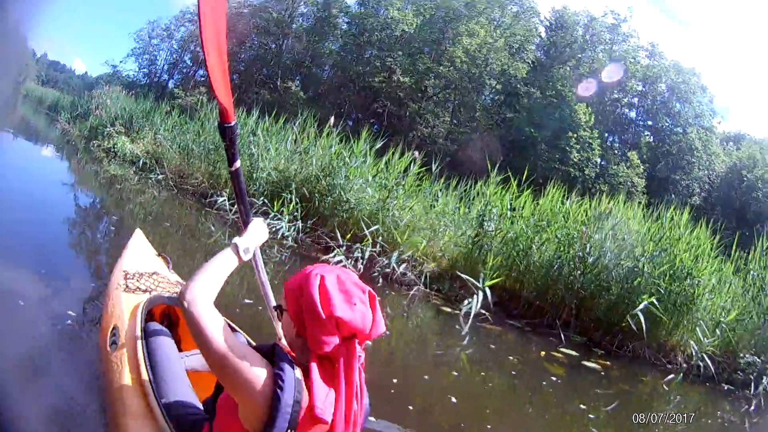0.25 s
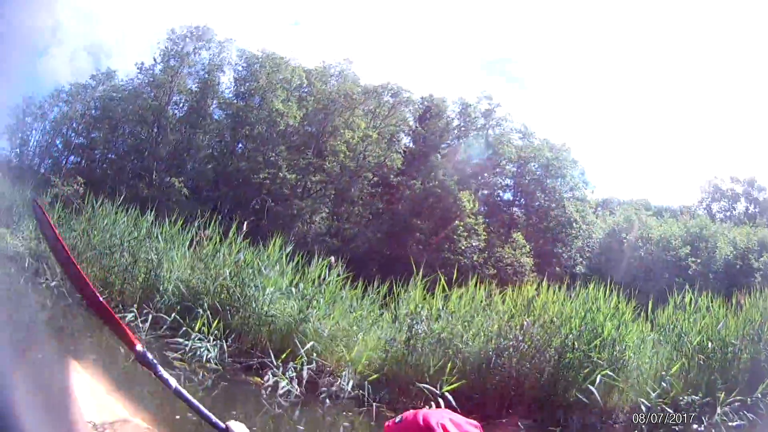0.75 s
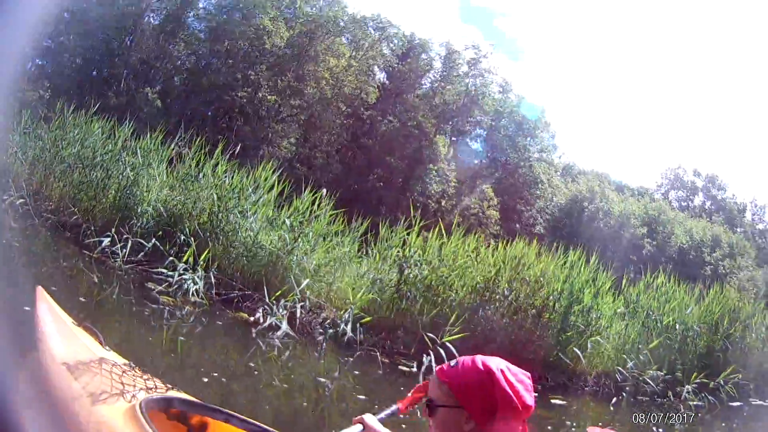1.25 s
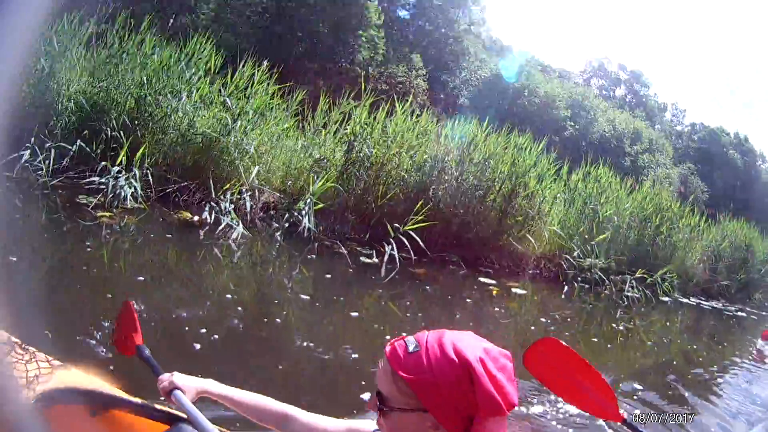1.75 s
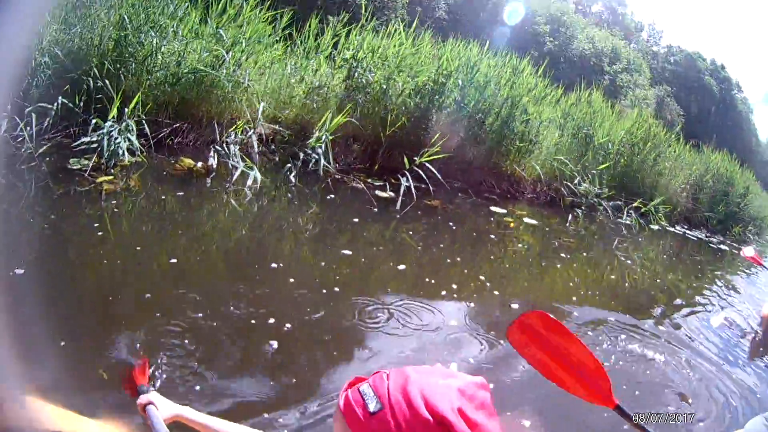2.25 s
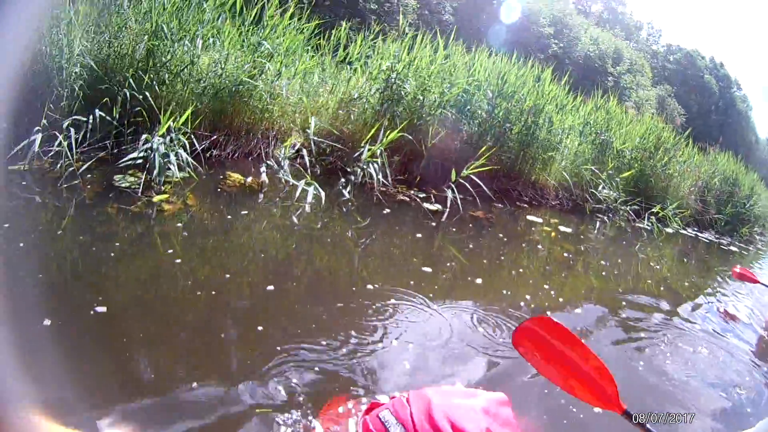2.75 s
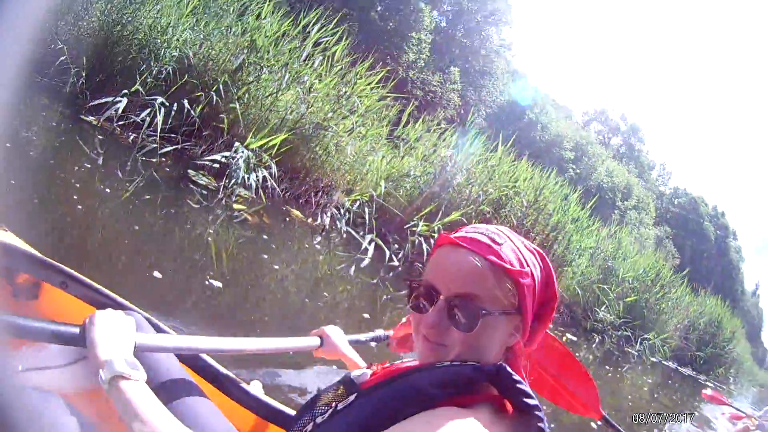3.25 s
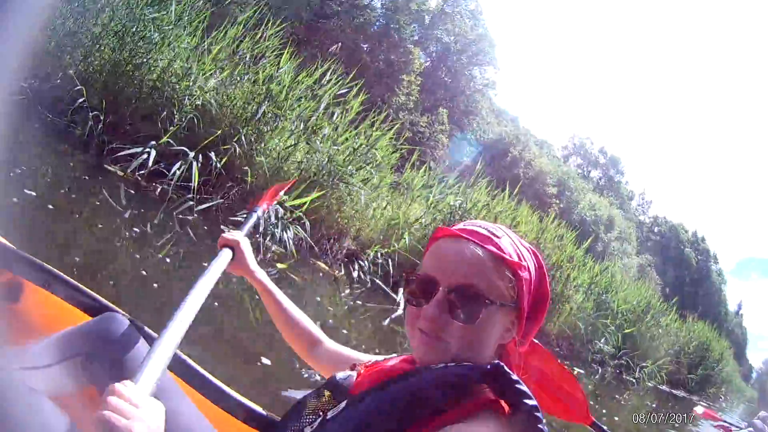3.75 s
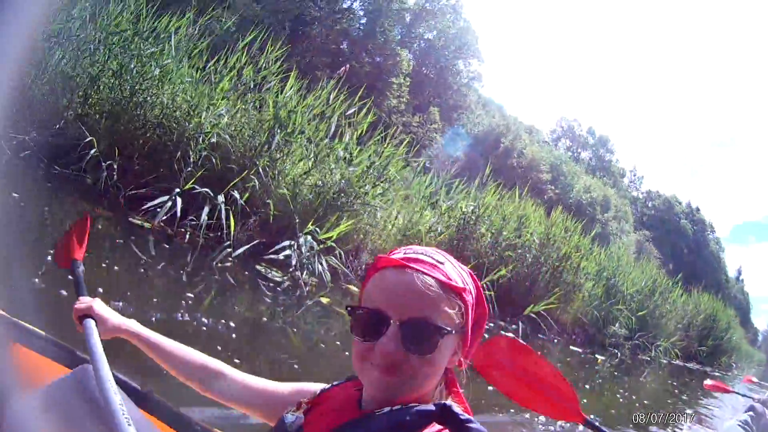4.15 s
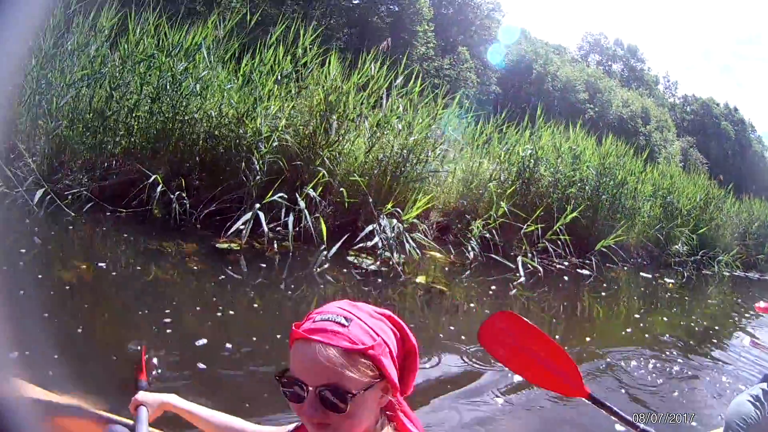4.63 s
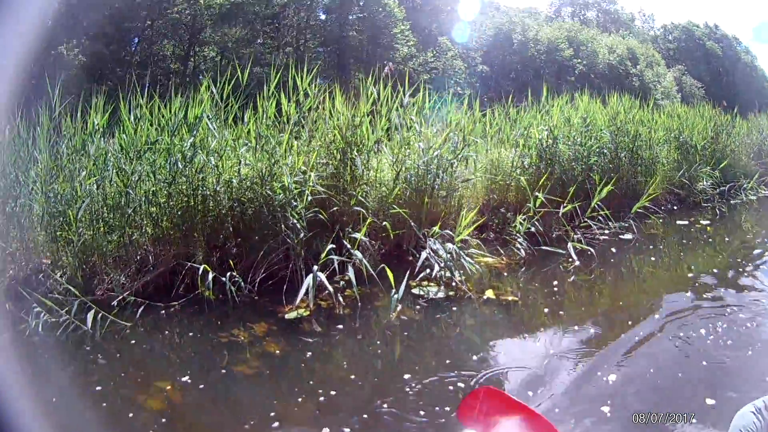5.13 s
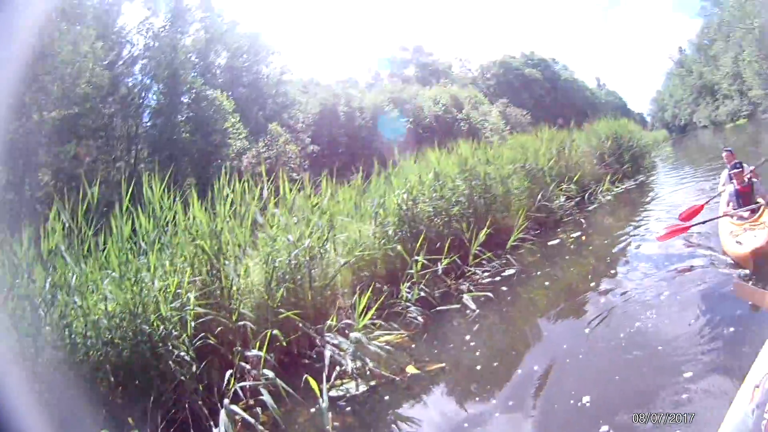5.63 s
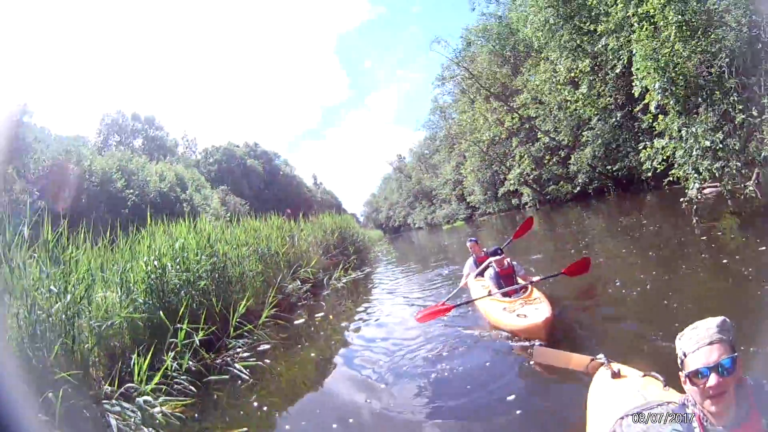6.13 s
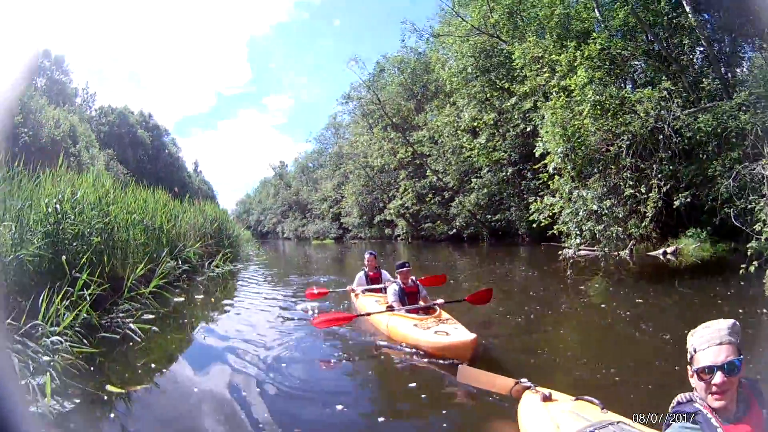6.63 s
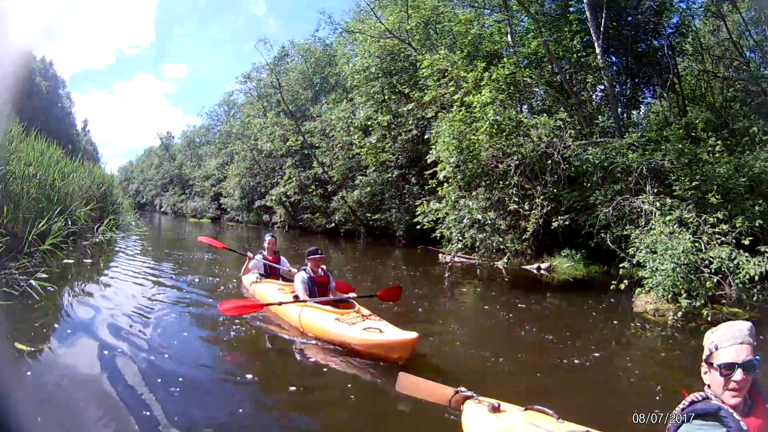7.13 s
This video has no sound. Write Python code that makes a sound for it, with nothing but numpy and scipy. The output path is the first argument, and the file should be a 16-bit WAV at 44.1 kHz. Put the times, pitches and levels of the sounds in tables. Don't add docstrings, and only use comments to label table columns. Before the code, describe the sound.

Close, muffled and dry, with no room echo. Soft fingers fumble and tap the plastic, a pause of low hiss, then several violent knocks on the hull within about a second, distorting the microphone. Tiny drips and very faint lapping come through the case. A single strong clack with a quick rattling follow-up comes later, then light handling ticks and a quiet ending.

```python
import sys
import numpy as np
from scipy import signal
from scipy.fft import rfft, irfft, next_fast_len
from scipy.io import wavfile
from scipy.ndimage import map_coordinates

SR = 44100
rng = np.random.default_rng(int(sys.argv[2]) if len(sys.argv) > 2 else 0)


def makeup_ratio(level_db):
    decades = np.asarray(level_db, float) / 20
    return 10 ** decades


def unload_wav(signal):
    wavfile.write(
        sys.argv[1],
        SR,
        np.round(np.clip(np.atleast_2d(signal).T, -1, 1) * 32767).astype(np.int16),
    )


N = 325458

# f/Hz, width/Hz, level/dB
SHELL = [(2980, 440, 0), (3727, 750, 1), (4653, 580, -2), (5900, 440, -10.5)]


def unit(x):
    return x / np.sqrt(np.mean(x ** 2) + 1e-20)


def filtered(x, response):
    m = next_fast_len(len(x) + 8192)
    spectrum = rfft(x, m) * response(np.fft.rfftfreq(m, 1 / SR))
    return irfft(spectrum, m)[:len(x)]


def noise(points):
    hz, db = np.transpose(points)
    return unit(filtered(rng.standard_normal(N), lambda f: makeup_ratio(np.interp(np.log(f + 1), np.log(hz), db))))


def resonant(modes):
    def response(f):
        total = 0
        for k, (center, width, db) in enumerate(modes):
            peak = 1j * f * width / (center * center - f * f + 1j * f * width)
            total = total + (-1) ** k * makeup_ratio(db) * peak
        return total
    return response


def wobble(rate):
    points = rng.standard_normal(int(N * rate / SR) + 4)
    return map_coordinates(points, [np.arange(N) * rate / SR])


def ring(t, hz, t60, rise):
    return np.sin(2 * np.pi * hz * t) * (1 - np.exp(-t / rise)) ** 2 * makeup_ratio(-60 * t / t60)


def add(track, s, sound):
    part = track[round(s * SR):][:len(sound)]
    part += sound[:len(part)]


def walls(x):
    # f/Hz, width/Hz, level/dB
    case_modes = [(833.3, 190, -4.5), (1450, 300, 3.5), (1800, 650, -3.5), (2020, 140, -7)]
    return filtered(x, lambda f: resonant(case_modes)(f) / (1 + 1j * f / 3200 - (f / 2500) ** 2))


def river():
    # t/s, level/dB
    swaying = [(0, -51), (.33, -50.5), (.7, -60), (1.01, -52), (1.4, -61.5), (1.77, -57.5), (2.15, -50.5),
               (2.28, -40), (2.35, -50), (2.6, -60.5), (3.12, -61), (3.95, -61.5), (4.13, -70), (4.54, -56),
               (4.9, -62.5), (5.63, -54.5), (5.9, -68.5), (7.38, -67)]
    # f/Hz, level/dB per Hz
    sway_spectrum = [(10, -29.5), (25, 1), (45, 1), (90, -7.5), (200, -23.5), (400, -57)]
    wash_spectrum = [(500, -31.5), (1100, -10.5), (1650, 1), (2200, -10.5), (3500, -30), (6000, -53.5)]
    # t/s, peak level/dB, pitch f/Hz
    drips = [(0.837, -50.5, 1690), (2.6191, -61.5, 1711), (2.7791, -58.5, 1800), (2.9995, -61, 1448),
             (3.136, -50.5, 1398), (3.2204, -53.5, 1437), (3.4293, -59.5, 1703), (3.5399, -55.5, 1733),
             (3.7091, -55, 1584), (3.8898, -59.5, 1545), (4.0698, -56, 1680), (4.109, -51, 1624),
             (4.1994, -57, 1800), (4.9301, -55, 1380), (4.9698, -54.5, 1400), (6.5494, -55, 1408),
             (6.7295, -58.5, 1625), (6.7492, -56.5, 1326), (6.8493, -47.5, 1770)]
    time = np.arange(N) / SR
    sway_db = np.interp(time, *np.transpose(swaying))
    out = makeup_ratio(sway_db + 2.2 * wobble(8.1)) * noise(sway_spectrum)

    nearest_s, width_s = 4.2, 3
    wash_db = -77 - 10 * ((time - nearest_s) / width_s) ** 2
    out += makeup_ratio(wash_db + 3 * wobble(25) + 2 * wobble(120)) * noise(wash_spectrum)

    t = np.arange(SR // 20) / SR
    climbing = t * (1 + 6 * t)
    for s, db, hz in drips:
        add(out, s, makeup_ratio(db + 8) * ring(climbing, hz, t60=0.014, rise=0.00072))
    return out


def hands():
    # t/s, f/Hz
    grip = [
        [(0.0, 1420), (0.194, 1510), (0.25, 1316), (0.436, 1337), (0.502, 1576), (0.558, 1560), (0.6, 1477)],
        [(1.8, 1450), (1.902, 1370), (2.232, 1458), (2.262, 1574), (2.32, 1567)],
        [(5.4, 1364), (5.76, 1440), (5.8, 1430)],
    ]
    # peak t/s, rise/s, fall/s, level/dB, brightness/dB
    strokes = [(0.042, 0.07, 0.044, -44, -19.5), (.126, .045, 0.018, -35.5, -11.5),
               (.2, 0.06, 0.13, -60, -29), (.29, 0.028, 0.1, -51, -19.5), (.37, 0.049, 0.072, -49, -21.5),
               (.46, .07, 0.073, -56.5, -15), (.59, 0.091, .07, -66.5, -16), (1.17, 0.046, 0.052, -70, -28),
               (1.9, 0.051, 0.031, -39.5, -24), (2.03, .07, .06, -52.5, -14.5),
               (2.12, .085, 0.022, -39.5, -29), (2.165, .035, 0.034, -30, -30),
               (2.205, .035, 0.035, -31.5, -23.5), (2.26, .05, .04, -41.5, -30),
               (2.302, .05, 0.013, -36, -36), (5.41, 0.041, 0.046, -60, -22),
               (5.485, 0.031, 0.044, -42, -26), (5.535, 0.052, .033, -43, -22.5),
               (5.6, 0.063, .03, -63.5, -20), (5.705, .07, 0.056, -54.5, -16.5)]
    # t/s, level/dB, t60/s, pressure thump/dB
    chatters = [
        (.99, -48.5, 0.11, 2),
        (1.082, -63.5, 0.39, 5.5),
        (1.626, -26, 0.14, 1),
        (1.662, -37, 0.13, 2.5),
        (1.818, -27.5, 0.066, 0),
        (1.94, -43.5, 0.43, 2),
        (4.44, -30.5, 0.18, 5),
        (4.503, -52.5, 0.033, -17),
    ]
    # f/Hz, width/Hz, level/dB
    lid = [(901.6, 700, -2), (2180, 990, 0)]
    seam = [(3750, 260, 0)]
    hull_modes = [(250, 11, -2), (463, 60, -10.5), (600, 83, -9), (870, 30, -7.5)]
    t = np.arange(N) / SR
    grain = makeup_ratio(2.8 * wobble(400) + .7 * wobble(90))
    slips = rng.standard_normal(N) * grain
    note_hz = np.interp(t, *np.transpose(np.concatenate(grip)))
    flutter = filtered(rng.standard_normal(N) * grain, lambda f: 1 / (1 + 1j * f / 200) ** 2)
    note = unit(flutter * np.sin(2 * np.pi * np.cumsum(note_hz) / SR))
    lid_sound = unit(filtered(slips, lambda f: resonant(lid)(f) ** 2))
    body = unit(note + 0.66 * unit(walls(slips)) + 0.22 * lid_sound)
    broad = [(3800, 2600, 0)]  # f/Hz, width/Hz, level/dB
    panels = unit(filtered(slips, lambda f: resonant(SHELL)(f) * resonant(broad)(f) + resonant(seam)(f) ** 2))
    thump = unit(filtered(slips, resonant(hull_modes)))

    out = np.zeros(N)
    for peak, rise, fall, db, bright_db in strokes:
        shape = np.interp(t, [peak - rise, peak, peak + fall], [0, 1, 0])
        out += makeup_ratio(db) * shape * (body + makeup_ratio(bright_db) * panels + makeup_ratio(-8.5) * thump)
    for s, db, t60, thump_db in chatters:
        shape = np.clip((t - s) / 0.0039, 0, 1) * makeup_ratio(-60 * np.abs(t - s) / t60)
        out += makeup_ratio(db) * shape * (body + makeup_ratio(-20) * panels + makeup_ratio(thump_db) * thump)
    return out


def hull():
    # t/s, boom level/dB, boom f/Hz, wall f/Hz
    nudges = [
        (.023, -34.5, 208, 596),
        (.064, -27, 218, 790),
        (0.076, -25.5, 200, 530),
        (0.429, -41, 292, 780),
        (0.987, -38, 262, 740),
        (0.999, -38.5, 260, 613),
        (1.079, -37, 258, 620),
        (1.161, -43.5, 250, 400),
        (4.332, -44.5, 241.4, 552),
        (5.478, -39.5, 263, 574),
    ]
    # t/s, boom level/dB, boom f/Hz, wall level/dB, wall f/Hz
    thuds = [(1.6155, 4.5, 243.6, -3, 601.6), (1.624, -14.5, 236, -11.5, 870), (1.654, 3, 223, -5, 621.2),
             (1.816, -21, 200, -20, 520), (1.924, -17.5, 227, -17, 762.3), (1.933, -10, 233.5, -8.5, 644.5),
             (2.134, -15, 254.7, -9.5, 868.8), (2.137, -34, 258, -9.5, 497.3),
             (2.212, -26, 253, -22.5, 636), (2.319, 2.5, 210.5, 5, 589.6), (2.322, -3.5, 164.8, -3.5, 1094),
             (2.325, -5, 330, -4.5, 420), (2.341, -24.5, 153.3, -19, 414), (4.437, -12, 235, -1, 500),
             (4.439, -22, 149, -10, 870), (4.490, -11.5, 207.5, -21.5, 609.4), (4.500, -32, 249, -24, 485)]
    # t/s, f/Hz, level/dB
    swings = [(.08, 58.9, -27.5), (1.617, 59.64, -23.5), (1.655, 38.2, -16), (1.82, 82, -33.5),
              (1.935, 79.55, -25.5), (2.136, 70.43, -26), (2.216, 57.76, -25.5), (2.218, 85.8, -28),
              (2.324, 33.19, -10.5), (2.326, 63.7, -8.5), (4.44, 82.26, -17), (4.44, 29.88, -22),
              (4.496, 44.9, -22.5), (5.477, 79.8, -44.5)]
    nudge_thuds = [(s, db, hz, db - 7, wall_hz) for s, db, hz, wall_hz in nudges]
    out, t = np.zeros(N), np.arange(SR // 3) / SR
    for s, boom_db, boom_hz, wall_db, wall_hz in thuds + nudge_thuds:
        t60 = 0.033 + 0.076 / (1 + ((boom_hz - 258) / 12) ** 2)
        boom = ring(t, boom_hz, t60, 0.00062) + .25 * ring(t, 0.8 * boom_hz, t60, .002)
        wall = ring(t, wall_hz, 0.046, 0.0006) + 1.3 * ring(t, 1.42 * wall_hz, 0.021, 0.00033)
        add(out, s, makeup_ratio(boom_db) * boom + makeup_ratio(wall_db) * wall)
    for s, hz, db in swings:
        t60 = .06 + 4.2 / hz
        add(out, s, makeup_ratio(db) * ring(t, hz, t60, 0.00041))
    return out


def clacks(rows, gain_db, t60, upper_db):
    notes, cracks, rattles = np.zeros(N), np.zeros(N), np.zeros(N)
    t = np.arange(SR // 12) / SR
    for s, ring_db, hz, contact_ms, crack_db, rattle_db in rows:
        rise = contact_ms / 1000
        burst = rng.standard_normal(len(t)) * (1 - np.exp(-t / rise)) * makeup_ratio(-60 * t / (.01 + 4 * rise))
        note = ring(t, hz, t60, rise) + makeup_ratio(upper_db) * ring(t, 2150, t60, rise)
        add(notes, s, makeup_ratio(ring_db) * note)
        add(cracks, s, makeup_ratio(ring_db + crack_db) * burst)
        add(rattles, s, makeup_ratio(ring_db + rattle_db) * burst)
    return makeup_ratio(gain_db) * (notes + filtered(cracks, resonant(SHELL)) + walls(rattles))


def case():
    # t/s, ring level/dB, ring f/Hz, rattle level/dB
    tap_table = [(0.0631, -17, 1500, -0.5), (0.0779, -19, 1370, 4.5), (0.1286, -19, 1480, -22),
                 (0.4254, -40.5, 1200, 10.5), (0.4445, -50, 1380, 12), (.4934, -47, 1310, 14),
                 (0.511, -37, 1620, 7), (0.988, -39, 1375, -10), (1.001, -38.5, 1260, 2),
                 (1.0786, -35, 1300, 0), (1.6951, -34.5, 1667, -5.5), (1.975, -28, 1320, 4),
                 (4.3334, -48.5, 1122, 6), (5.325, -58, 2150, 11), (5.372, -54, 2013, 7),
                 (5.431, -45.5, 1580, 9.5), (5.476, -24, 1387, -5), (5.598, -47, 1500, 7),
                 (5.676, -50, 1286, -5), (5.7251, -48.5, 2140, -6), (5.8664, -57, 2020, 3),
                 (5.9229, -49.5, 2140, 13), (6.32, -49.5, 1800, 6), (6.4743, -55, 1352, 3)]
    # t/s, ring level/dB, ring f/Hz, contact/ms, rattle level/dB
    blow_table = [(1.6145, 14, 1522, 1.28, -4.5), (1.6238, 1.5, 1500, 0.56, -8),
                  (1.651, 23, 1450, 2.18, -15), (1.816, -11.5, 1470, 0.53, 4.5),
                  (1.926, -21.5, 1400, 1.04, -4), (1.932, 9, 1407, 2, -7), (2.131, -21, 1210, 1.59, -9.5),
                  (2.1335, 16, 1455, 1.27, -17.5), (2.2135, -12, 1500, 0.55, 4.5),
                  (2.3178, 20.5, 1568, 1.375, .5), (2.341, -6, 1400, 1.1, -4),
                  (4.436, 14.5, 1356, 1.08, -4.5), (4.458, -18, 1450, 0.99, -10.5),
                  (4.472, -13, 1450, 3, -10), (4.4897, -2.5, 1480, 0.49, -5), (4.500, -10.5, 1510, .4, -8)]
    tap_contact_ms, blow_crack_db = 0.65, -23.5
    taps = [(s, db, hz, tap_contact_ms, -15 + 0.62 * rattle_db, rattle_db)
            for s, db, hz, rattle_db in tap_table]
    blows = [(s, db, hz, ms, blow_crack_db, rattle_db) for s, db, hz, ms, rattle_db in blow_table]
    tapping = clacks(taps, gain_db=8.5, t60=0.0094, upper_db=-13)
    return tapping + clacks(blows, gain_db=10.5, t60=0.0095, upper_db=-30)


def pole():
    pole_modes = {"bend": (86.5, .2), "long": (424.5, 2.1), "tube": (627, .44), "double": (1296, .23),
                  "clamp": (3200, .13), "screw": (4335, .19)}
    hums = [(1.614, 1.664, "screw", -45), (1.661, 1.821, "tube", -27), (1.655, 1.708, "clamp", -41.5),
            (1.935, 2.137, "tube", -38), (1.939, 1.972, "clamp", -41), (2.141, 2.17, "screw", -52.5),
            (2.22, 2.266, "screw", -57), (2.322, 3.499, "long", -44.5), (2.324, 2.807, "tube", -36.5),
            (2.325, 2.6, "double", -24.5), (2.333, 2.6, "bend", -23.5), (4.429, 5.405, "long", -50),
            (4.499, 4.895, "tube", -48), (4.483, 4.699, "double", -41), (4.485, 4.626, "screw", -50.5),
            (4.49, 4.699, "bend", -31)]
    out = np.zeros(N)
    for start, stop, mode, db in hums:
        t = np.arange(round((stop - start) * SR)) / SR
        hz, t60 = pole_modes[mode]
        release = np.clip((t[-1] - t) / .006, 0, 1)
        add(out, start, makeup_ratio(db) * ring(t, hz, t60, rise=0.0013) * release)
    return out


def scene():
    return (river() + hands() + hull() + case() + pole())[None]


def top_cut(x):
    return signal.sosfilt(signal.butter(12, 15960, fs=SR, output="sos"), x)


def record(dry):
    # f/Hz, level/dB per Hz
    hiss = [(15, -5.5), (50, -2), (230, -9.5), (500, -16), (1400, -24.5), (3000, -34), (5600, -41),
            (9300, -45), (12000, -42.5), (14500, -39.5), (16500, -40)]
    x = filtered(dry[0], lambda f: 1 / (1 + 1j * f / 4500) ** 2 / (1 + 1j * f / 5500 - (f / 6000) ** 2))
    x = x / (1 + np.abs(x / .97) ** 30) ** (1 / 30)
    x = filtered(x, lambda f: 1 / (1 + (f / 14500) ** 4)) + makeup_ratio(-58) * noise(hiss)
    x = filtered(x, lambda f: np.clip((15900 - f) / 400, 0, 1) * 1j * f / (12 + 1j * f))
    mix = np.clip(x, -1, 1)[None]
    return top_cut(mix)


dry = scene()
out = record(dry)
unload_wav(out)
```